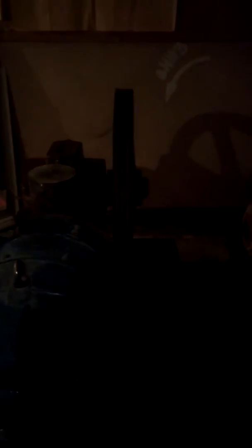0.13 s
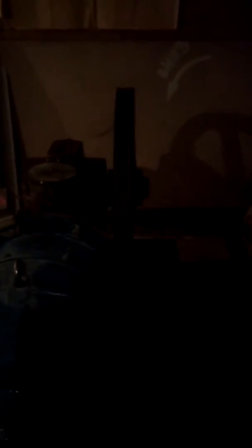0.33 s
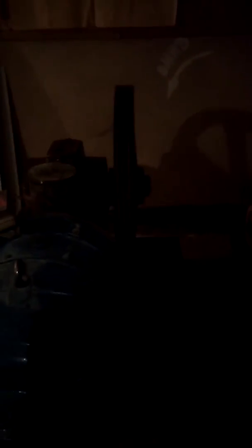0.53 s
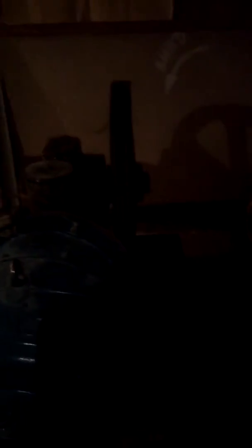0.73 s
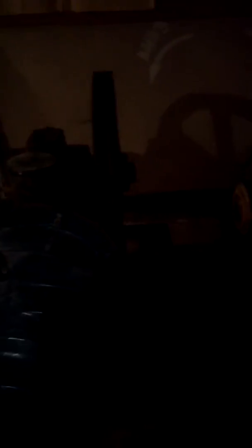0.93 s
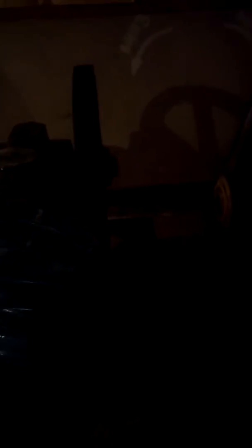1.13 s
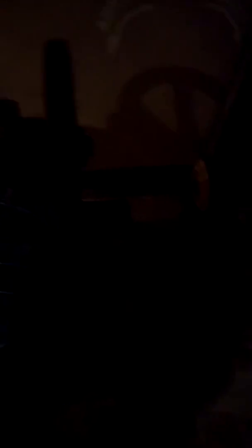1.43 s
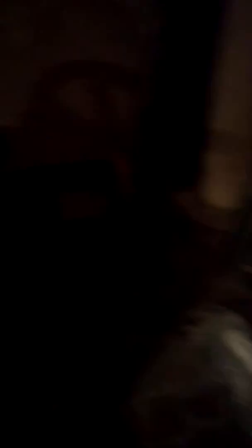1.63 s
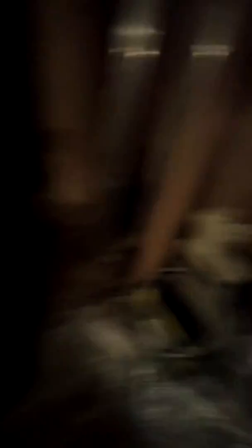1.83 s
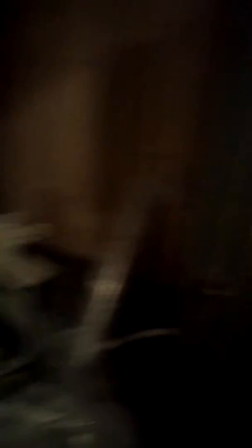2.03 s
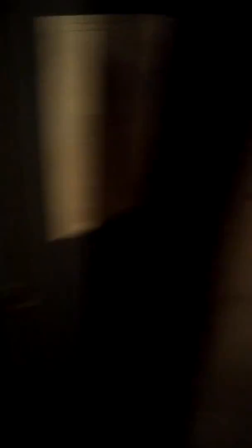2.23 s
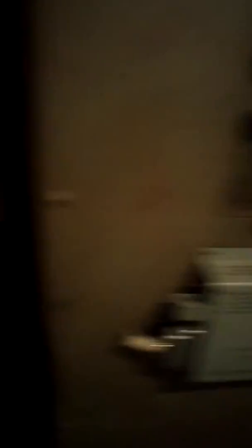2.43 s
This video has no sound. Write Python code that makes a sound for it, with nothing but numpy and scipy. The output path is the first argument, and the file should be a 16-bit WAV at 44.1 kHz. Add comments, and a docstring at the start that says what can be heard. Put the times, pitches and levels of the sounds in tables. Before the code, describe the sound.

Two sharp clacks of lift switchgear echo in a quiet machine room over faint hum

```python
"""Lift machinery switching in a hard-walled room

Lift machinery switches twice: contactors chatter in and the brake drops, then a relay snaps. Each blow
is a noise crack with a noise tail, coloured by metal resonances, that decays as the room does. The motor
hum, a band of noise, swells and dies away, with a slight return at the end. Air buffets the right port as
low noise and single pulses; a faint hiss swells before the relay and as the hand-held camera turns."""
import sys
import numpy as np
from scipy import signal
from scipy.io import wavfile
from scipy.ndimage import uniform_filter1d

SR = 44100
rng = np.random.default_rng(int(sys.argv[2]) if len(sys.argv) > 2 else 0)


def output_pcm(signal):
    """Save a mono or channel-first signal as 16-bit PCM at the path in sys.argv[1].

    Samples are clipped to [-1, 1] before scaling.
    """
    pcm = np.clip(np.atleast_2d(signal).T, -1, 1) * 32767
    wavfile.write(sys.argv[1], SR, np.round(pcm).astype(np.int16))


def boost(x):
    """Linear amplitude factor 10**(x/20) for a level x in decibels (scalar or array-like)."""
    u = np.asarray(x, float) / 20
    return 10 ** u


N = 114660  # samples


def evened(x):
    """Normalises signal power: scales to rms 1 over all channels."""
    return x / np.sqrt(np.mean(x ** 2) + 1e-20)


def read(points, hz):
    """Interpolates a spectrum on a logarithmic frequency axis, close to the ear's pitch scale."""
    f, value = np.transpose(points)
    return np.interp(np.log(hz + 1), np.log(f + 1), value)


def curve(points, column=1):
    """Linear interpolation in time: reads a control curve at every sample."""
    table = np.transpose(points)
    return np.interp(np.arange(N) / SR, table[0], table[column])


def add(mix, s, sound):
    """Superposition: adds a two-channel sound to the mix from time s, cut off at the end of the mix."""
    part = mix[:, round(s * SR):][:, :sound.shape[1]]
    part += sound[:, :part.shape[1]]


def room_decay(t, hz):
    """Reverberation: echoes build up exponentially and each frequency falls 60 dB in its own time."""
    # Each row: frequency in Hz, reverberation time T60 in seconds.
    reverberation = [(80, 0.33), (170, 1.24), (300, 0.63), (500, 0.61), (1000, 0.76), (2400, 0.64),
                     (6000, 0.51), (10000, 0.33), (15000, 0.36)]
    # Each row: frequency in Hz, time constant of the echo build-up in seconds.
    build_up = [(100, 0.012), (500, 0.023), (2000, .004), (8000, 0.00067)]
    hop_s = t[1] - t[0]
    decay = boost(-60 * t / read(reverberation, hz)[:, None])
    return decay * (1 - np.exp(-(t + hop_s) / read(build_up, hz)[:, None]))


def noise(tone, size, length, patchy_db, ring=(), dying=False):
    """Filtered noise by short-time synthesis: random spectra, partly coherent between the two ports."""
    # Each row: frequency in Hz, left-right correlation from -1 to 1.
    likeness = [(60, 1), (130, .9), (290, 0.64), (640, 0.31), (1000, 0), (1500, -0.28), (2300, -0.14),
                (6000, 0), (15000, 0)]
    # Each row: frequency in Hz, left minus right level in dB.
    lean = [(60, 1), (130, 1), (290, 0.5), (640, 1), (1410, 0), (3100, -2), (6820, 0), (15000, -1)]
    hop = size // 4
    frames, hz = length // hop + 5, np.fft.rfftfreq(size, 1 / SR)
    a, b, c, d, patches = rng.standard_normal((frames, len(hz), 5)).T
    # Smoothing over frequency and time gives slow random level patches.
    patches = uniform_filter1d(patches, size=6, axis=0)
    patches = evened(uniform_filter1d(patches, size=8, axis=1))

    same = np.clip(read(likeness, hz), -1, 1)[:, None]
    left = a + 1j * b
    right = same * left + np.sqrt(1 - same ** 2) * (c + 1j * d)

    resonance_db = sum(db / (1 + (2 * (hz - f) / width) ** 2) for f, width, db in ring)
    shape_db = read(tone, hz) + resonance_db
    lean_db = read(lean, hz) / 2
    port_db = np.array([shape_db + lean_db, shape_db - lean_db])[..., None]
    spectra = np.array([left, right]) * boost(port_db + patchy_db * patches)
    if dying:
        spectra = spectra * room_decay(np.arange(frames) * hop / SR, hz)
    return signal.istft(spectra, nperseg=size, noverlap=size - hop)[1][:, :length]


def struck_metal(blows, tone, ring, rise_s):
    """Impact excitation: each blow is a short direct crack, then ringing metal fills the room with echoes."""
    out, t = np.zeros((2, N)), np.arange(SR) / SR
    first = SR // 20  # 50 ms
    for s, db, crack_db, pan_db in blows:
        tail = noise(tone, size=1024, length=SR, patchy_db=1.5, ring=ring, dying=True)
        # The metal's own short ring and the first reflections stand above the long tail.
        tail = tail * (1 + boost(-9) * np.exp(-t / 0.013))
        tail = tail / np.sqrt(np.mean(tail[:, :first] ** 2))
        crack = evened(noise(tone, size=512, length=first, patchy_db=0))
        pan = np.array([[pan_db], [-pan_db]]) / 2
        crack = crack * boost(crack_db + 11.5 + pan) * np.exp(-t[:first] / 0.0013)
        add(tail, 0, crack)
        onset = np.minimum(t / rise_s, 1)
        add(out, s, boost(db) * onset * tail)
    return out


def brake():
    """Impact and resonance: the dropping brake strikes five times and excites its metal."""
    # Each row: start in seconds, level in dB, crack in dB (11.5 dB is added), crack left minus right in dB.
    blows = [(.285, -25, -10.5, 0), (.294, -13, -2, -4), (.304, -12, -7, 0.5), (.318, -22.5, -11.5, 0.5),
             (.345, -21, -7.5, -3)]
    # Each row: frequency in Hz, relative density in dB per Hz.
    tone = [(59, -52), (100, -22.5), (205, -12.5), (355, -17), (448, -5.5), (811, -16), (1260, -11.5),
            (1630, -13.5), (2880, -7.5), (3410, -10), (6040, -7.5), (8120, -25), (15600, -38)]
    # Resonances of the metal. Each row: frequency in Hz, width in Hz, height above the tone in dB.
    ring = [(160, 44, 4.8), (501, 200, 6.4), (1326, 120, 9.5), (2840, 120, 5), (4100, 170, 11),
            (5150, 250, 7.1), (6130, 200, 8), (7650, 200, 5.8), (10100, 300, 13)]
    return struck_metal(blows, tone, ring, rise_s=0.001)


def relay():
    """Impact and resonance: the relay snaps in two weak blows and two strong ones."""
    # Each row: start in seconds, level in dB, crack in dB (11.5 dB is added), crack left minus right in dB.
    blows = [(.8075, -25.5, 0, 8.5), (.813, -31.5, 3, 2.5), (.8298, -10, 1, -3), (.833, -13.5, -2.5, 9)]
    # Each row: frequency in Hz, relative density in dB per Hz.
    tone = [(59, -42.5), (100, -17), (181, -15), (468, -20), (794, -15.5), (1400, -15.5), (2140, -11.5),
            (3140, -9.5), (5550, -2), (7950, -8), (9410, -25.5), (10200, -18.5), (14700, -32),
            (15600, -34.5)]
    # Resonances of the metal. Each row: frequency in Hz, width in Hz, height above the tone in dB.
    ring = [(182, 40, 4.9), (800, 160, 3), (2290, 300, 5), (4500, 200, 4), (5350, 440, 4), (5730, 280, 6.6),
            (6530, 250, 4.8), (6400, 150, 4), (10600, 400, 8), (14800, 500, 10)]
    return struck_metal(blows, tone, ring, rise_s=0.0009)


def contactors():
    """Repeated impact: the contactors chatter in with eight blows in a tenth of a second."""
    # Each row: start in seconds, level in dB, crack in dB (11.5 dB is added), crack left minus right in dB.
    blows = [(.171, -36, -12, 3), (.183, -31.5, -12, -1), (.193, -27.5, -14, 2), (.2025, -17.5, -8.5, 3),
             (.212, -23.5, -8, -1.5), (.251, -27, -5.5, 1.5), (.259, -17.5, -6.5, 0), (.267, -19, -10, 5)]
    # Each row: frequency in Hz, relative density in dB per Hz.
    tone = [(59, -51), (100, -15), (421, -21.5), (777, -28), (864, -13.5), (1140, -18.5), (2010, -13.5),
            (2190, -17), (5790, -4.5), (8470, -20.5), (15600, -26.5)]
    # Resonances of the metal. Each row: frequency in Hz, width in Hz, height above the tone in dB.
    ring = [(3760, 300, 12), (5700, 780, 4.5), (6370, 780, 8.5), (9700, 320, 3.5)]
    return struck_metal(blows, tone, ring, rise_s=0.0019)


def buffeting():
    """Wind-like pressure fluctuation: low noise with random swells, 21.5 dB weaker in the left port."""
    # Each row: frequency in Hz, relative density in dB per Hz.
    tone = [(12, -40.5), (20, -10.5), (76, 5), (145, -7), (219, -32.5), (248, -22), (400, -26),
            (520, -45.5), (880, -120)]
    # Each row: time in seconds, level in dB before the swells.
    level = [(0, -31.5), (.3, -53), (.8, -43.5), (1.3, -47), (1.7, -46.5), (2, -45.5), (2.3, -37.5),
             (2.42, -45), (2.5, -33), (2.6, -34)]
    lumps = uniform_filter1d(rng.standard_normal(N), size=900)
    lumps = evened(uniform_filter1d(lumps, size=900))
    lumpy_db = 3  # rms of the swells
    rumble = evened(noise(tone, size=2048, length=N, patchy_db=4.0))
    return boost(curve(level) + lumpy_db * lumps) * rumble * boost(np.array([[-21.5], [0]]))


def puffs():
    """Pressure pulses: single puffs on the right port, each a negative peak between two positive lobes."""
    # Each row: centre in seconds, peak in dB, nominal pulse frequency in Hz.
    pulses = [(0.182, -27.5, 102), (0.5323, -13, 115), (1.149, -31.5, 135), (1.387, -19, 94),
              (1.512, -25, 114), (1.556, -32.5, 78.5), (1.876, -27.5, 110), (1.9166, -9.5, 117.3),
              (2.046, -31, 110), (2.257, -30.5, 77), (2.297, -36.5, 90), (2.378, -33, 79),
              (2.463, -29.5, 80.2), (2.488, -23.5, 106), (2.511, -37, 75), (2.537, -33, 90),
              (2.588, -20.5, 99)]
    drag = 0.27  # the recoil is slower than the push
    out, t = np.zeros((2, N)), np.arange(N) / SR
    for s, db, hz in pulses:
        stretch = 1 + drag * np.tanh((t - s) * hz * 2)
        turns = np.pi * (t - s) * hz / stretch
        out[1] -= boost(db) * (1 - 2 * turns ** 2) * np.exp(-turns ** 2)
    return out


def motor_hum():
    """Band-limited noise under a level envelope: the hum swells, dies away and returns slightly."""
    # Each row: frequency in Hz, relative density in dB per Hz.
    tone = [(59, -44), (100, -10), (129, -29), (199, -7.5), (341, -6), (417, -3.5), (650, -8), (910, -23),
            (1140, -16), (2500, -40), (3250, -68.5), (5500, -120)]
    # Each row: time in seconds, level in dB.
    level = [(0, -45.5), (.15, -43), (.3, -39), (.75, -50), (1.2, -57), (1.5, -60), (2.6, -55)]
    return boost(curve(level)) * evened(noise(tone, size=2048, length=N, patchy_db=2))


def hiss():
    """Amplitude-modulated treble noise: swells before the relay and as the camera turns."""
    # Each row: frequency in Hz, relative density in dB per Hz.
    tone = [(1470, -40), (2500, -8), (3360, -15), (4550, -3.5), (6200, -2), (6760, -11), (7980, -33),
            (14000, -40.5)]
    # Each row: time in seconds, level in dB, left minus right in dB.
    level = [(0, -81, -4), (.745, -79.5, 9), (.768, -47.5, -2), (.81, -47, 5), (.85, -72.5, 0.5),
             (1.85, -80, 1.5), (1.97, -67, 2.5), (2.15, -61.5, 7), (2.33, -56.5, 7), (2.4, -51, 7),
             (2.47, -55, 8), (2.556, -55.5, 10), (2.6, -58, 2)]
    pan = curve(level, column=2) / 2
    port_db = curve(level) + np.array([pan, -pan])
    return boost(port_db) * evened(noise(tone, size=512, length=N, patchy_db=2.0))


def room_floor():
    """Stationary coloured noise: the steady room floor at -55 dB, with a faint low drone."""
    # Each row: frequency in Hz, relative density in dB per Hz.
    tone = [(88, -37), (170, -3.5), (260, -9.5), (430, -13.5), (860, -5), (1300, -7), (2000, -14.5),
            (3100, -27), (4300, -21), (5800, -19.5), (6900, -30.5), (7900, -43.5), (15600, -46)]
    # Each row: frequency in Hz, width in Hz, height above the floor in dB.
    drone = [(170, 40, 6)]
    # A negative patch depth only turns the random patches over.
    return boost(-55) * evened(noise(tone, size=2048, length=N, ring=drone, patchy_db=-3.1))


def scene():
    """Superposition: the sum of all sources at the two microphone ports."""
    machinery = contactors() + brake() + relay()
    air = buffeting() + puffs()
    return machinery + air + motor_hum() + hiss() + room_floor()


def band_limit(x):
    """A steep low-pass at the top of the band."""
    return signal.sosfilt(signal.butter(12, 15780, fs=SR, output="sos"), x)


def record(dry):
    """High-pass filtering at 21 Hz, then amplitude limiting: the input clips at 0.99."""
    low_cut = signal.butter(2, 21, "high", fs=SR, output="sos")
    mix = np.clip(signal.sosfilt(low_cut, dry), -0.99, 0.99)
    return band_limit(mix)


dry = scene()
out = record(dry)
output_pcm(out)
```